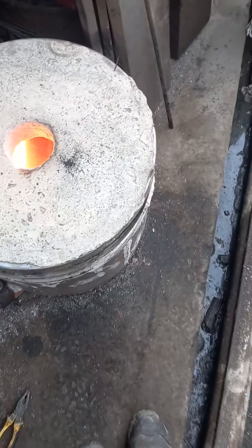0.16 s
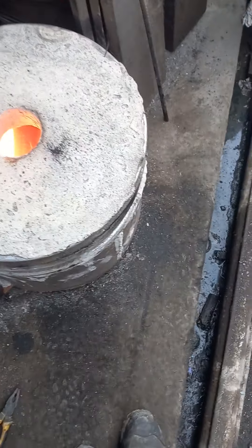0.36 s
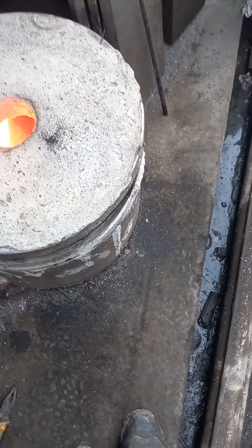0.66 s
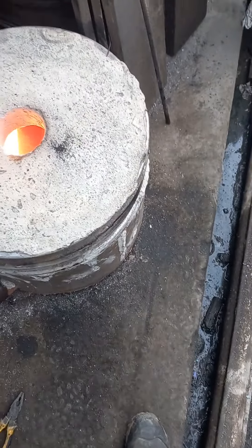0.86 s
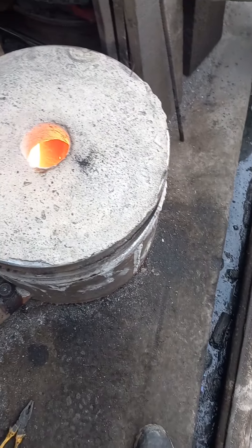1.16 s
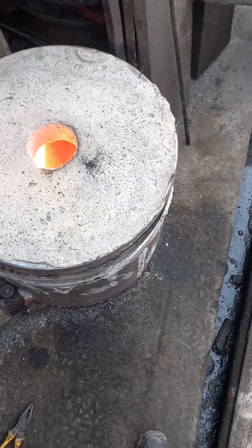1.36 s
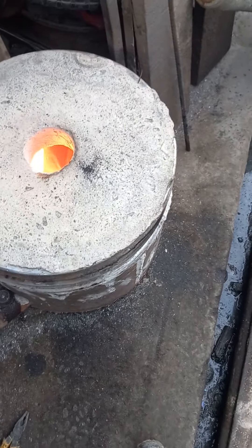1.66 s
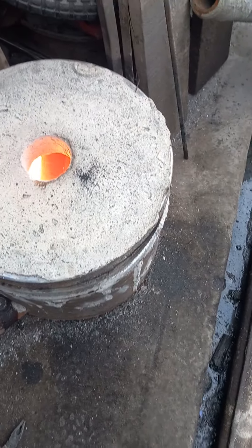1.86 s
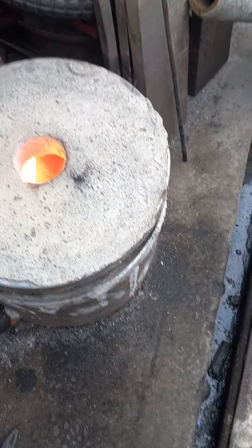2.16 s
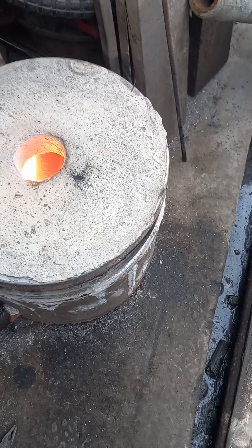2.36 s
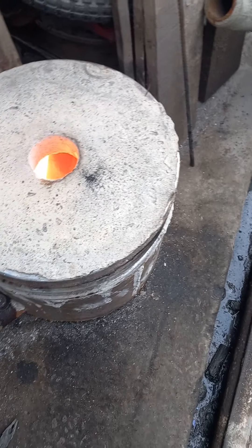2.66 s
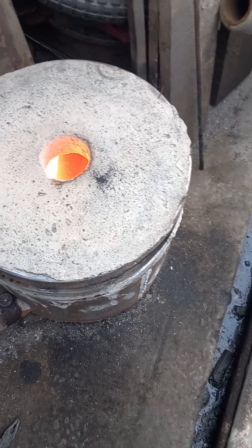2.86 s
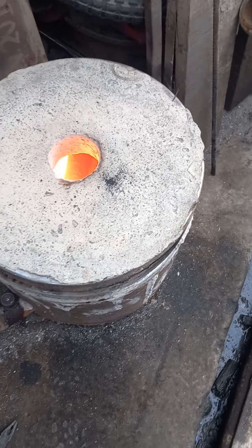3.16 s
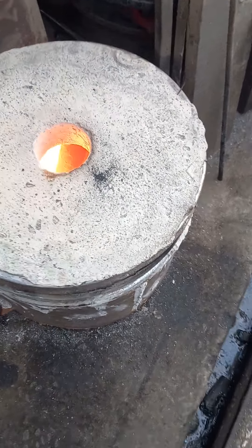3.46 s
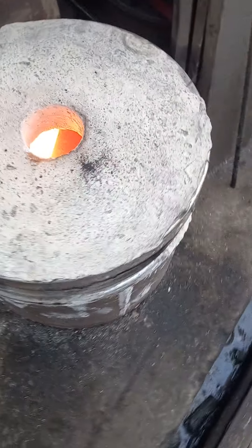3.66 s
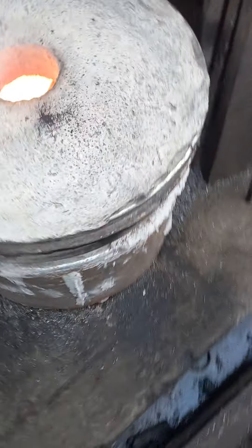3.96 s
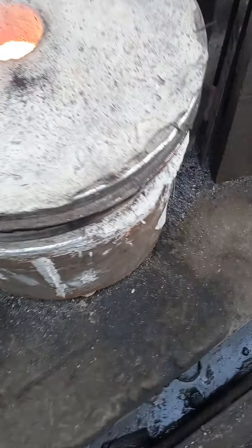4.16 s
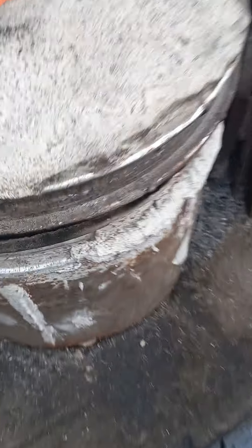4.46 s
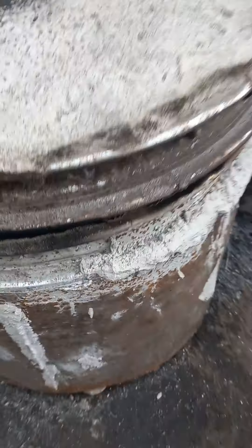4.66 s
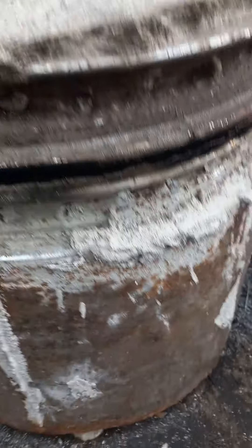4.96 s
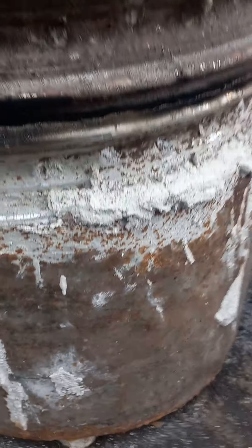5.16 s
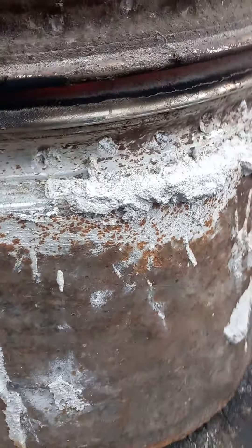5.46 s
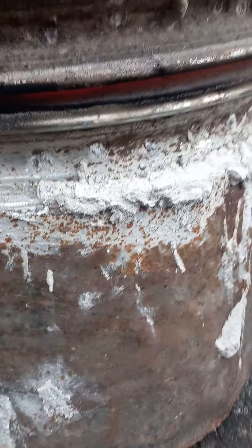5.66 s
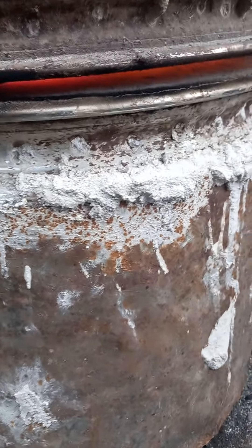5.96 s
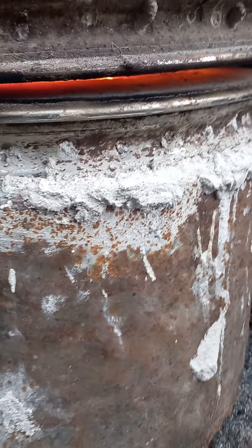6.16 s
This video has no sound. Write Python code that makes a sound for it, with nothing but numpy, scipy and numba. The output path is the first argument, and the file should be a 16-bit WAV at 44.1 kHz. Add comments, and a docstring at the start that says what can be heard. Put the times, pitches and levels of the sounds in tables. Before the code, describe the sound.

A gas-fired barrel furnace burns in a yard, heard close up on a hand-held phone. Its deep, booming roar and low rumble run from start to finish, about six seconds, wavering a little in strength, with a brief surge at the very beginning. An electric blower runs throughout, adding a softer rush of air, a thin steady whine and a faint higher buzz. A small engine ticks rapidly and very faintly in the distance, fading away by about 3 seconds. From roughly 3.3 to 5.2 seconds the microphone moves down to the side of the barrel: the roar changes tone slightly and leans to the left, and soft swells of airy hiss pass through. From about 5 seconds to the end, the blower's buzz is a little clearer, while the furnace's roar remains the main sound.

```python
"""A deep, booming roar: a gas-fired barrel furnace in a yard, flame turbulence ringing its chamber.
A brushed blower rushes, buzzes and whines; a small engine ticks further off and fades.
Heard through the two ports of a hand-held phone that looks down on the barrel, then crouches
to its side, where the lid's rim hides the vent and the motor comes into view."""
import sys
import numpy as np
from scipy import signal
from scipy.fft import rfft, irfft, next_fast_len
from scipy.io import wavfile
from scipy.ndimage import uniform_filter1d
from numba import njit

SR = 44100
rng = np.random.default_rng(int(sys.argv[2]) if len(sys.argv) > 2 else 0)


def store_wav(level_fs):
    """Save 16-bit WAV to argv[1]."""
    pcm = np.round(np.clip(np.atleast_2d(level_fs), -1, 1) * 32767)
    wavfile.write(sys.argv[1], SR, pcm.T.astype(np.int16))


N = 279153
T = np.arange(N) / SR
FFT_SIZE = next_fast_len(N)
BIN_HZ = np.arange(FFT_SIZE // 2 + 1) * SR / FFT_SIZE + 1e-3

# Phone moves: start, end.
CROUCH_S = (3.3, 5.18)
BELOW_LID_S = (3.39, 3.82)
TURN_S = (3.5, 5.35)  # left port swings towards the barrel
MOTOR_IN_VIEW_S = (4.4, 5.35)


def undb(db):
    return 10 ** (np.asarray(db) / 20)


def unit_rms(x):
    return x / np.sqrt(np.mean(x ** 2))


def curves(table):
    """Columns of a table, interpolated over time."""
    seconds, *columns = np.transpose(table)
    return [np.interp(T, seconds, column) for column in columns]


def move(span_s, before=0, after=1):
    """Linear ramp during a phone move."""
    start, end = span_s
    return before + (after - before) * np.clip((T - start) / (end - start), 0, 1)


def wander(rate_hz):
    """Random steps, smoothed twice; RMS 1."""
    hold = int(SR / rate_hz)
    steps = np.repeat(rng.standard_normal(N // hold + 1), hold)
    return unit_rms(uniform_filter1d(uniform_filter1d(steps, hold), hold)[:N])


@njit
def bandpass(x, hz, width_hz):
    """State-variable filter, unity gain at its moving centre."""
    y, band, low = np.empty(len(x)), 0., 0.
    for i in range(len(x)):
        g, damping = np.tan(np.pi * hz[i] / SR), width_hz / hz[i]
        v = (band + g * (x[i] - low)) / (1 + g * (g + damping))
        band, low, y[i] = 2 * v - band, low + 2 * g * v, damping * v
    return y


def ring(hz, width_hz):
    """Turbulence through a two-stage resonance; RMS 1."""
    hz, width_hz = hz * np.ones(N), float(width_hz)
    once = bandpass(rng.standard_normal(N), hz, width_hz)
    return unit_rms(bandpass(once, hz, width_hz))


def ports(x, pan_db, lead_ms):
    """One source at two ports. Pan is left minus right; the left leads."""
    late = np.interp(T - lead_ms / 1000, T, x)
    return np.array([x * undb(pan_db / 2), late * undb(-pan_db / 2)])


def left_only(x):
    return np.array([x, np.zeros(N)])


# Each row: time in seconds, level in dB.
TICK_LEVEL = [(0, -52), (.5, -52), (.9, -56), (1.25, -51.5), (1.6, -53), (2.4, -56.5), (4.2, -72),
              (6.33, -90)]
# Each row: frequency in Hz, relative left and right levels in dB.
TICK_SPECTRUM = [(3000, -18.5, -20), (5500, -15.5, -6), (8000, -8, -16.5), (11200, 5, 8), (14000, 5.5, 7),
                 (16000, -9, -5.5)]


def engine():
    """Distant engine, slowly speeding up: one bright puff a stroke, no two alike."""
    start_hz, speedup_hz_per_s, scatter_db = 27.371, .7194, 2.6
    rise, fall = .04, .16  # shares of a stroke
    strokes = .3 + start_hz * T + speedup_hz_per_s * T ** 2 / 2
    phase = strokes % 1
    stroke_db = scatter_db * rng.standard_normal((int(strokes[-1]) + 1, 2))
    strength = undb(stroke_db)[strokes.astype(int)].T
    puff = (1 - np.exp(-phase / rise)) * np.exp(-phase / fall)
    hz, *sides_db = np.transpose(TICK_SPECTRUM)
    colour = undb([np.interp(np.log(BIN_HZ), np.log(hz), db, left=-90) for db in sides_db])
    white = rfft(rng.standard_normal((2, FFT_SIZE)))
    hiss = unit_rms(irfft(white * colour, FFT_SIZE)[:, :N])
    return hiss * strength * puff / puff.max() * undb(curves(TICK_LEVEL)[0])


def yard_echo():
    """Deep echo off the walls, as a low noise band unrelated at the two ports."""
    return undb(-48) * np.array([ring(hz=100, width_hz=19) for _ in range(2)])


# Each row: middle and length in seconds, start, end and width in Hz, peak level and pan in dB.
HISS_SWELLS = [(0.218, 0.28, 4360, 4570, 700, -55, -17), (3.406, 0.41, 4230, 4100, 800, -55, -11),
               (3.757, 0.44, 4000, 4000, 600, -53, -3), (4.4, 1.4, 560, 660, 170, -44, 1.5),
               (4.5, 2.6, 930, 1050, 100, -48, 3), (4.8, 1.2, 2280, 2460, 380, -49, -13.5),
               (5.5, 0.66, 1850, 1930, 150, -51, 4), (5.6, .7, 3950, 3970, 500, -53, -6),
               (5.895, 1.5, 5700, 5950, 800, -61, -16), (5.8, 2.4, 620, 680, 200, -45, -5),
               (.2, .9, 15100, 14900, 5000, -64, -12), (.2, .6, 8300, 8300, 2500, -64, 0),
               (5.9, 1.2, 14400, 14400, 4000, -65, -10), (5.57, .6, 1250, 1285, 25, -54, 0),
               (5.29, .1, 12200, 12250, 600, -66, -6)]


def swells():
    """Bands of hiss that rise, glide and sink as the phone moves."""
    out = 0
    for middle_s, length_s, start_hz, end_hz, width_hz, db, pan_db in HISS_SWELLS:
        along = np.clip((T - middle_s) / length_s + .5, 0, 1)
        hiss = ring(start_hz + (end_hz - start_hz) * along, width_hz) * np.sin(np.pi * along)
        out += undb(db + np.c_[[pan_db, -pan_db]] / 2) * hiss
    return out


# Each row: centre and width in Hz, level, change below the lid and pan in dB, left lead in ms.
PIPE_MODES = [(1181, 153, -47, -1, -0.5, -0.15), (2155, 115, -50.5, -10, -10, -0.1)]


def feed_pipe():
    """Pipe resonances; the draught wavers in level and pitch."""
    flutter_db, pitch_drift = 1.2, .003
    out = 0
    for hz, width_hz, db, below_lid_db, pan_db, lead_ms in PIPE_MODES:
        gain = undb(db + below_lid_db * move(BELOW_LID_S) + flutter_db * wander(9))
        mode = ring(hz * (1 + pitch_drift * wander(3)), width_hz)
        out += ports(gain * mode, pan_db, lead_ms)
    return out


# Each row: frequency in Hz, then base density in dB per Hz: left and right standing, the same crouched.
RUSH_SPECTRUM = [(420, -70.5, -70.5, -59, -62), (544, -68.5, -68, -65, -64.5),
                 (675, -72.5, -70, -68.5, -65), (1120, -70.5, -76.5, -73.5, -75),
                 (1750, -78.5, -74, -73, -71), (2200, -78.5, -75.5, -78, -75),
                 (2900, -81.5, -72, -75.5, -69), (3340, -84, -86.5, -80, -78.5),
                 (3800, -84, -86, -82.5, -79.5), (4500, -85.5, -81, -88, -82.5),
                 (6040, -96.5, -82.5, -101.5, -82.5), (7130, -83, -104, -90.5, -106.5),
                 (7830, -100, -104, -99.5, -109), (11000, -94, -94.5, -97, -102.5),
                 (13000, -97, -94, -99.5, -91.5), (15500, -100, -93, -101, -91.5)]
# Each row: time in seconds, treble gain in dB.
RUSH_TREBLE = [(0, 2.5), (1.4, -0.5), (2.2, -0.5), (2.7, -1.5), (4.1, -2), (5.05, 1), (6.33, 0.5)]


def air_rush():
    """Blown air in quarter-octave bands; ground and barrel reflections make each band drift."""
    alike_below_hz, treble_onset_hz = 736, (2400, 8000)
    port_drift_db, flicker_db = .6, .8
    crouch, treble_db = move(CROUCH_S), curves(RUSH_TREBLE)[0]
    hz, *columns_db = np.transpose(RUSH_SPECTRUM)
    coherence = .66 / (1 + (BIN_HZ / alike_below_hz) ** 4)
    left, unrelated = rfft(rng.standard_normal((2, FFT_SIZE))) * np.sqrt(SR / 2)
    pair = np.array([left, coherence * left + np.sqrt(1 - coherence ** 2) * unrelated])
    out = 0
    for centre_hz in 400 * 2 ** np.arange(0, 5.5, .25):
        band = np.clip(1 - 4 * np.abs(np.log2(BIN_HZ / centre_hz)), 0, 1)
        centre_db = np.c_[[np.interp(np.log(centre_hz), np.log(hz), db) for db in columns_db]]
        base_db = (1 - crouch) * centre_db[:2] + crouch * centre_db[2:]
        treble_share = np.interp(np.log(centre_hz), np.log(treble_onset_hz), [0, 1])
        drift_db = port_drift_db * np.array([wander(4.1), wander(5.2)]) + flicker_db * wander(12)
        out += irfft(pair * band, FFT_SIZE)[:, :N] * undb(base_db + treble_share * treble_db + drift_db)
    return out


# Each row: shaft order, group index, left and right base levels in dB.
WHINE_ORDERS = [(11, 2, -66, -62), (18, 0, -66, -58), (26, 2, -74, -73), (71, 1, -70, -79),
                (72, 1, -68.5, -79), (73, 1, -78, -89), (86, 2, -84, -81), (92, 2, -82, -79),
                (94, 2, -81, -77), (95, 2, -74, -73), (96, 2, -74, -70), (97, 2, -80, -78),
                (104, 3, -83, -75), (106, 3, -86, -77), (107, 3, -81, -75), (108, 3, -80, -76),
                (109, 3, -81, -70), (110, 3, -86, -79), (111, 3, -87, -78), (112, 3, -84, -77),
                (114, 3, -87, -82), (116, 3, -83, -74), (117, 3, -86, -79)]
# Each row: time in seconds, gains of groups 0 to 3 in dB.
WHINE_GROUP_GAINS = [(0, -9, -7, -2, -1), (1, -9, -6, -1, -1), (2.2, -9, -6, -1, 0), (3.0, -8, -8, -2, -2),
                     (3.4, 0, -5, 0, -4), (4.15, -1, -6, -2, -3), (4.35, 0, 2, -3, -3),
                     (4.8, -2, -2.5, -3, -3), (5.1, 5, -3, -2, 0), (5.45, 0, -5, 0, 1), (5.8, 4, -4, 1, 4),
                     (6.33, -6, 0, -1, 3.5)]


def whine(shaft_rad):
    """High shaft orders; hand shake slips their phase between the ports."""
    group_db = curves(WHINE_GROUP_GAINS)
    start_rad = rng.uniform(0, 2 * np.pi)  # shared: neighbouring orders beat once a turn
    sway_rad = [left_only(1.5 * wander(5)) for _ in group_db]
    out = 0
    for order, group, *sides_db in WHINE_ORDERS:
        flicker_db = 2.2 * wander(5) + 2.5 * np.array([wander(18), wander(18)])
        tone = np.sin(order * (shaft_rad + start_rad) + sway_rad[group])
        out += undb(np.c_[sides_db] + group_db[group] + flicker_db) * tone
    return out


# Each entry: offset from the commutator tone in multiples of twice the mains frequency.
BUZZ_SIDEBANDS = [-4, -3, -2, -1, 0, 1, 2, 4, 5, 6]
# Each row: left and right base levels of one sideband in dB.
SIDEBAND_LEVELS = [(-67, -61), (-56, -48), (-55, -46), (-55, -47), (-59, -51), (-67, -62), (-63, -60),
                   (-69, -65), (-65, -62), (-69, -65)]
# Each row: time in seconds, gain past the barrel in dB.
BUZZ_GAIN = [(0, -5.5), (.5, -7.5), (.72, -1.5), (1, -4), (1.4, -6.5), (1.9, -6), (2.2, -2.5), (2.6, -7.5),
             (2.9, -6), (3.25, -2.5), (3.6, -6), (3.9, -11), (4.3, -11), (4.7, -5.5), (4.9, -2), (5.25, 0),
             (5.5, -.5), (5.85, 3.5), (6.1, 2), (6.33, 2)]
# Each row: time in seconds, extra left gain in dB, left lead in radians.
BUZZ_STEREO = [(0, -3, -1), (.5, 0, -1.8), (.8, -3, -2.1), (1.3, 2, -2.5), (1.9, 3, -2.9), (2.25, -2, -2.2),
               (2.8, 2, -2.5), (3.3, -4, -2.1), (3.7, -1, -.8), (4.4, 1, 1.9), (5, 2, 0), (5.5, 1, -.3),
               (5.9, -3, -1.1), (6.33, 0, -1.3)]
# Each row: time in seconds, tilt in dB per sideband step.
SIDEBAND_TILT = [(0, -2.4), (4.4, -2.2), (5.3, -1.2), (5.8, 0), (6.33, 1)]


def brush_buzz(shaft_rad):
    """Commutator tone chopped at twice the mains; from above, the barrel hides the upper sidebands."""
    bars, chop_hz = 24, 120
    left_db, lead_rad = curves(BUZZ_STEREO)
    gain_db = curves(BUZZ_GAIN)[0] + left_only(left_db)
    tilt_db = curves(SIDEBAND_TILT)[0]
    out = 0
    for k, sides_db in zip(BUZZ_SIDEBANDS, SIDEBAND_LEVELS):
        phase = bars * shaft_rad + 2 * np.pi * k * chop_hz * T + left_only(lead_rad)
        shadow_db = tilt_db * np.clip(k + 2, -1, 3)
        flutter_db = move(MOTOR_IN_VIEW_S, 1.7, .8) * (wander(4) + wander(25))
        out += undb(np.c_[list(sides_db)] + gain_db + shadow_db + flutter_db) * np.sin(phase)
    return out


# Each row: time in seconds, level and pan in dB, left lead in radians.
BLADE_TRACK = [(0, -40, 0, -.5), (.12, -41.5, -1, -.6), (.3, -45, 3, -.7), (.5, -44.5, 6, -1.5),
               (.7, -44, 1, -2.1), (.9, -44.5, -4, -2.4), (1.3, -41.5, 0, -2.7), (1.5, -43, -1, -2.8),
               (1.95, -40, -1, -2.8), (2.4, -42.5, -2, -2.6), (2.7, -41, -1, -2.7), (3.1, -43.5, 2, -2.2),
               (3.35, -44, 1, -2), (3.53, -48, 2, -1.2), (3.63, -42, 4, .4), (3.9, -40.5, 7, .9),
               (4.1, -39.5, 1, .6), (4.3, -37, -1, 1.1), (4.5, -39.5, 1, 1.3), (4.7, -42.5, 11, 1.2),
               (4.9, -42.5, 3, -1.4), (5.1, -45.5, -9, -1.8), (5.3, -46, -4, .3), (5.5, -44, -4, -.8),
               (5.7, -43, -8, -1.1), (6.33, -43.5, -12, -1.7)]


def blade_tone(shaft_rad):
    """Blade-passing tone at the moving phone."""
    blades = 9
    db, pan_db, lead_rad = curves(BLADE_TRACK)
    flutter_db = move(BELOW_LID_S, 1.5, 1) * (wander(8) + .5 * wander(30))
    gain = undb(db + flutter_db + np.array([pan_db, -pan_db]) / 2)
    return gain * np.sin(blades * shaft_rad + left_only(lead_rad))


# Each row: time in seconds, shaft speed in Hz.
SHAFT_SPEED = [(0, 133.1), (2, 133.4), (3.6, 133.9), (6.33, 133.95)]


def blower():
    """Blades, brushes and whine, locked to one slightly wobbling shaft."""
    shaft_hz = curves(SHAFT_SPEED)[0] * (1 + .0003 * wander(25))
    shaft_rad = 2 * np.pi * np.cumsum(shaft_hz) / SR
    return np.sqrt(2) * (blade_tone(shaft_rad) + brush_buzz(shaft_rad) + whine(shaft_rad))


# Each row: centre and width in Hz, base level in dB.
BILLOW_BANDS = [(91.3, 56, -29.5), (150, 70, -32)]
# Each row: time in seconds, gain in dB.
BILLOW_GAIN = [(0, -0.5), (1.2, 0.5), (3.4, 1), (3.9, -2), (4.6, .5), (6.33, 1.5)]


def billows():
    """Rumble of the flame's slow billows."""
    gain_db = curves(BILLOW_GAIN)[0]
    return sum(undb(db + gain_db) * ring(hz, width_hz) for hz, width_hz, db in BILLOW_BANDS)


# Each row: centre and width in Hz, relative level and its change below the lid in dB.
VENT_MODES = [(307, 81, -1, -4.5), (383.5, 59, -9.5, 11.5)]


def lid_vent():
    """Vent modes just above the boom, quieter once the rim hides them."""
    modes = sum(undb(db + below_lid_db * move(BELOW_LID_S)) * ring(hz, width_hz)
                for hz, width_hz, db, below_lid_db in VENT_MODES)
    return undb(move(BELOW_LID_S, -28, -45)) * modes


# Each row: time in seconds, level in dB.
BOOM_LEVEL = [(0, -10), (.15, -22), (.27, -14.5), (.45, -16), (.9, -19.5), (1.4, -16), (1.8, -16.5),
              (2.2, -19), (2.5, -17), (2.75, -18.5), (3.3, -17.5), (3.68, -14), (3.85, -17), (4.3, -19),
              (4.48, -14.5), (4.6, -17), (4.85, -19), (5.6, -20), (6, -22), (6.33, -19.5)]


def chamber():
    """Flame turbulence rings two close chamber modes."""
    main = ring(move(CROUCH_S, 235.2, 227.6), width_hz=50)
    second = undb(move(CROUCH_S, -5, -9)) * ring(hz=262, width_hz=43.5)
    return undb(curves(BOOM_LEVEL)[0]) * (main + second)


def furnace():
    """Chamber, vent and billows at the ports; below the lid a narrow band above the boom dips."""
    dip_hz, dip_width_hz, dip_share = 325., 55., .7
    pan_db, lead_ms = move(TURN_S, -1, 6.5), move(TURN_S, .13, .44)
    roar = chamber() + lid_vent()
    roar -= dip_share * move(BELOW_LID_S) * bandpass(roar, np.full(N, dip_hz), dip_width_hz)
    return ports(roar, pan_db, lead_ms) + ports(billows(), .5 + .1 * pan_db, 1.4 * lead_ms - .2)


def scene():
    """Furnace, its air supply and the engine beyond."""
    return furnace() + yard_echo() + air_rush() + feed_pipe() + swells() + blower() + engine()


def record(dry):
    """The phone trims the deep bass and cuts the top."""
    low_cut_hz, top_hz = 48, 15740
    thin = signal.sosfilt(signal.butter(5, low_cut_hz, "high", fs=SR, output="sos"), dry)
    return signal.sosfilt(signal.ellip(16, .3, 80, top_hz, fs=SR, output="sos"), thin)


dry = scene()
out = record(dry)
store_wav(out)
```